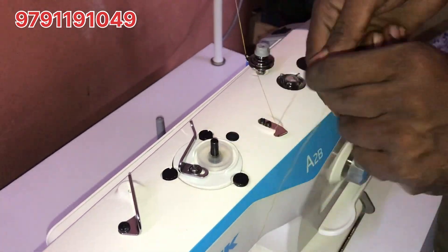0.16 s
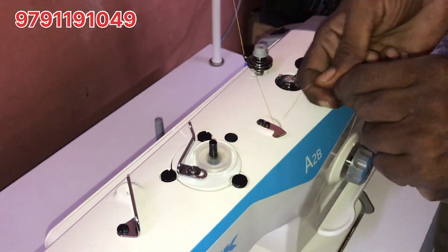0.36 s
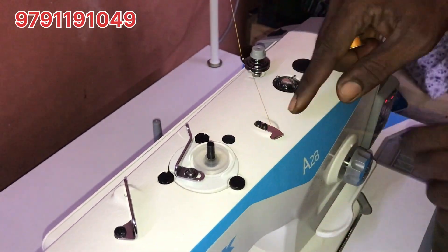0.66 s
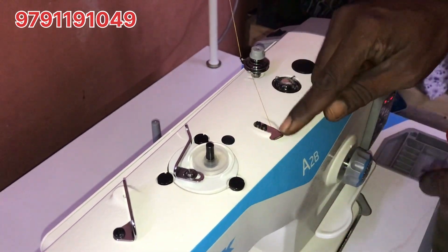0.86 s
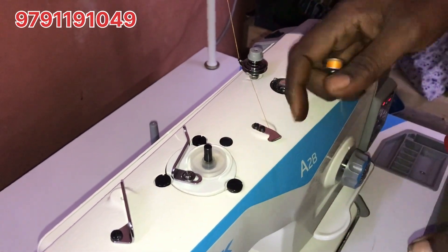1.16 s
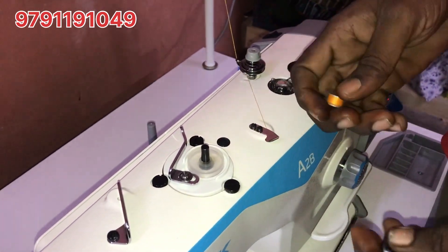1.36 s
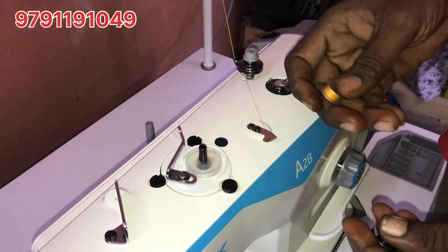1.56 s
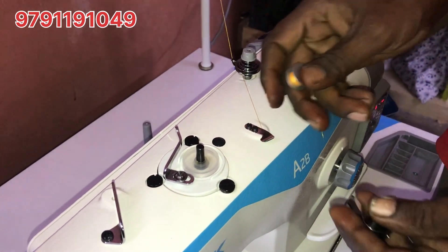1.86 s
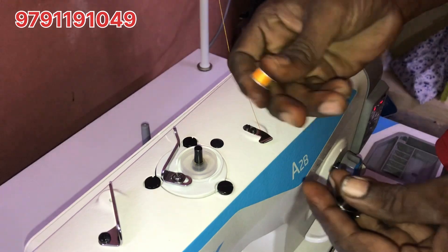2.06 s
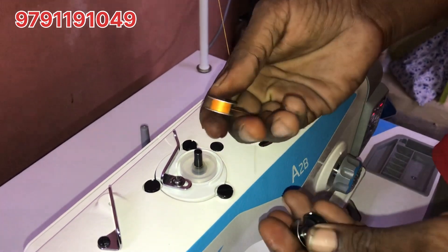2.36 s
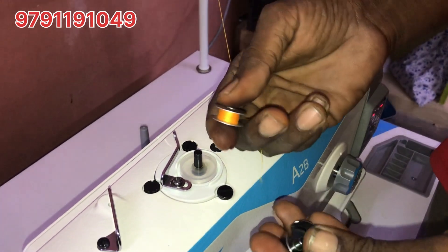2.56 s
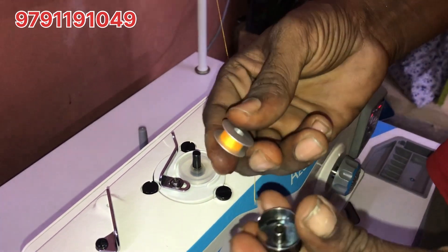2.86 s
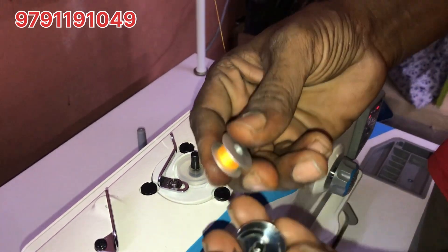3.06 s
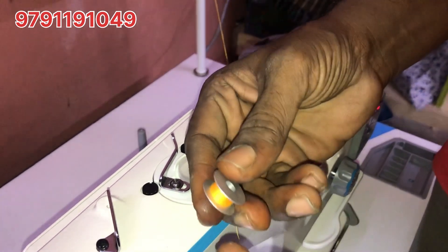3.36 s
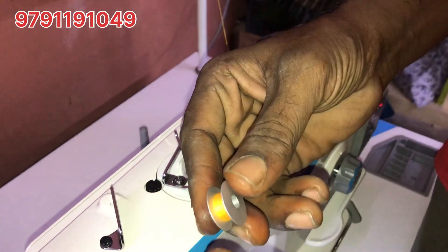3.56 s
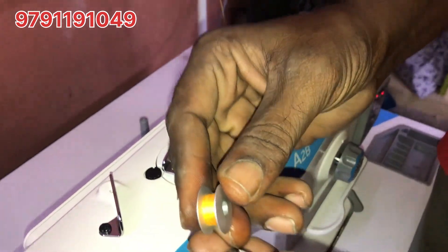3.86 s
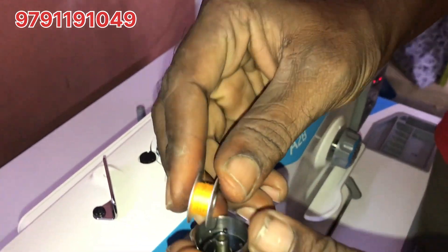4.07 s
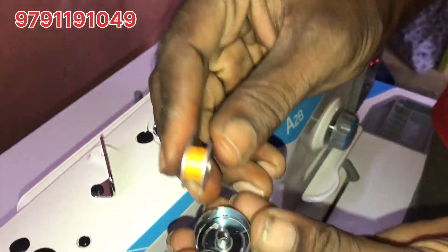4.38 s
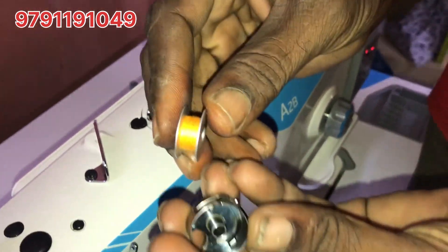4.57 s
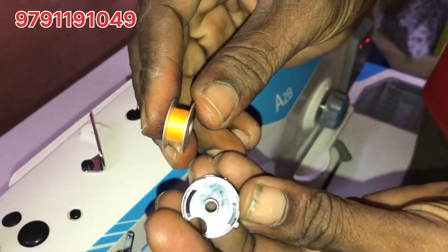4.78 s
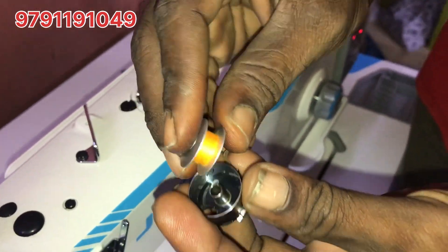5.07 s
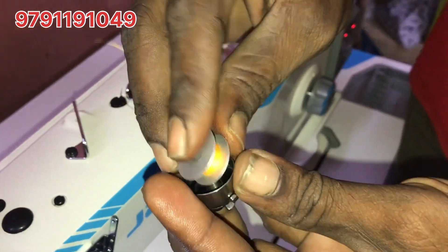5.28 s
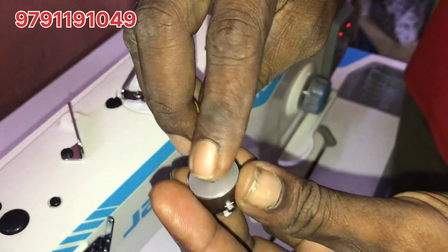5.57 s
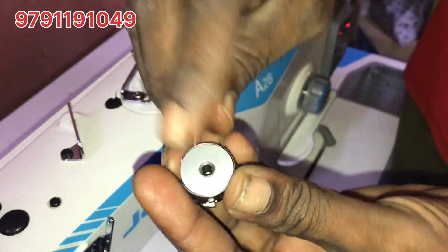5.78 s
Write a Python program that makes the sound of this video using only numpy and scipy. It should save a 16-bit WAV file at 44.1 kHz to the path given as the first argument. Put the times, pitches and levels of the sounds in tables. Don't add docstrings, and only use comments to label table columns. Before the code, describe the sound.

At 0 s a short knock rings the wooden table while a low machine hum and whirr sag away, with soft dull thumps until about 0.3 s. Around 0.31 to 0.38 s two or three tiny bright ticks of a pedal switch and clutch are heard, and the motor gives a brief nudge, swelling in hum and friction with a table thump. It eases off and coasts from about 0.5 to 0.75 s, then the drive grabs again with another thump, surging up by 1 s. From about 1.3 s to the end near 6 s it runs flat out at constant speed: deep throbbing hum near 60 Hz and its multiples, dense bright whirr with rapid fluttering pulses, thin gear whine and high hiss. Low wavering stand hums fade after about 3.5 s, and the low hum gets slightly fuller as the microphone nears. Small workshop, one close microphone, identical channels.

```python
import sys
import numpy as np
from scipy import signal
from scipy.fft import rfft, irfft
from scipy.io import wavfile
from scipy.ndimage import uniform_filter1d

SR = 44100
rng = np.random.default_rng(int(sys.argv[2]) if len(sys.argv) > 2 else 0)


def wav_out(sig):
    wavfile.write(sys.argv[1], SR, np.round(np.clip(np.atleast_2d(sig).T, -1, 1) * 32767).astype(np.int16))


def undo_db(level):
    steps = np.asarray(level, float) / 20
    return 10 ** steps


N = 261292

SHAFT_HZ, PATTERN_TURNS = 59.70, 7
# time in seconds, deviation from set speed in percent.
SPEED_CURVE = [(0, -12), (.33, -12), (.44, 0), (.6, 0), (.76, -4), (.84, 2), (1.0, 1.5), (1.25, .25),
               (1.6, .03), (5.93, -.03)]
# time in seconds, level over running in dB.
UNBALANCE_CURVE = [(0, -8), (.08, -34), (.37, -15.5), (.4, -12), (.466, 2.5), (.516, 2), (.58, -5.5),
                   (.65, -4), (.774, -22), (.8, -8.5), (.842, 0.5), (.98, 4.5), (1.11, 0), (1.23, -3),
                   (1.3, -0.5), (2.2, -1.5), (3.8, -0.5), (5.93, 0)]
# time in seconds, level over running in dB.
EFFORT_CURVE = [(0, -1.5), (.06, -9.5), (.11, -16.5), (.2, -21), (.305, -27.5), (.318, -8.5), (.345, -6.5),
                (.38, 0.5), (.45, 3), (.55, -1), (.66, -5.5), (.72, -8), (.76, -2), (.83, 1), (1.04, -1.5),
                (1.3, -0.5), (2, -.5), (5.93, 0)]
# time in seconds, share of the way.
NEARING_CURVE = [(0, 0), (2.6, 0.21), (3.8, 0.82), (5.93, 1)]
# switch closes, drive takes hold, pedal lifts, all in seconds.
PEDAL_PRESSES = [
    (.31, .38, 0.514),
    (0.766, .77, 7),
]
# frequency in Hz, level in dB, t60 in seconds.
KNOCK_MODES = [(677, -24, 0.29), (612, -22.5, 0.1), (504, -37, .2), (307, -32, 0.16), (1270, -31, 0.16),
               (950, -26, 0.13), (810, -30, .08), (205, -34, 0.26)]
# time in seconds, level in dB, frequency in Hz, time to ring down by
# about 33 dB in seconds.
TABLE_THUMPS = [(.005, -40, 172, 0.12), (0.031, -25.5, 87.5, 0.37), (.07, -27, 115.7, 0.34),
                (.17, -29, 188, 0.29), (0.181, -27, 130, 0.28), (.24, -29, 109.5, .3),
                (0.374, -18, 93.2, 0.32), (.575, -14.5, 91.5, 0.27), (.56, -29.5, 290, 0.47),
                (.7, -32, 60, 0.35), (.68, -23, 105, .3), (.785, -18, 101, 0.25)]
# frequency in Hz, width in Hz, level in dB.
TABLE_MODES = [(105, 32, -46.5), (138, 17, -46), (295.6, 18, -45), (551, 72, -42.5)]
# level in dB, share of unbalance sag, lead in seconds, near gain in dB.
LOW_ORDERS_DRIVE = [
    (-31, 1.7, 0.033, 5),
    (-31.5, 1.2, 0.055, -0.2),
]
# lag in seconds, share of effort swing, smoothing in seconds, near gain in dB.
WHIRR_DRIVE = [
    (0.026, 0.51, 0.024, -3),
    (.001, 1.04, .002, 0.64),
    (.001, 1.02, .004, 1.5),
]
# frequency in Hz, density in dB per Hz.
FRICTION_SPECTRUM = [(30, -19), (60, -12), (100, -18.5), (180, -3.5), (260, -12.5), (420, -8), (600, -3.5),
                     (850, -9.5), (1500, -6), (5100, -7.5), (5700, -12.5), (7500, -12.5), (10500, -14),
                     (15800, -10)]
# frequency in Hz, width in Hz, gain in dB.
CASING_MODES = [(1920, 62, 2), (2440, 220, -1), (3290, 210, 2.5), (3900, 180, 1.5), (4200, 130, 0),
                (4450, 250, 1.5), (5500, 290, 0.5), (5860, 300, 1), (6130, 320, 5.5), (7300, 220, 0.5),
                (9300, 2000, 2), (10300, 450, -2), (13700, 1200, 0.5), (15830, 210, 9), (6630, 250, -2),
                (7600, 250, -3), (13400, 400, 2), (14950, 500, 0), (14000, 150, 1)]
# frequency in Hz, level in dB.
REPEATING_SPECTRUM = [(200, -20), (700, -12), (1500, -10), (3000, -8), (5000, -6), (7000, -2), (10000, -2),
                      (12500, -4), (15000, -10)]
# place in turns, strength in dB, centre in Hz, decay in turns.
TURN_CONTACTS = [(.03, 2.5, 15000, .1), (.24, -1, 15000, .08), (.45, 4, 15000, .1), (.11, 2, 4500, .04),
                 (.57, 3, 4500, .07), (.85, 0, 4500, .07), (.24, 0, 1800, .1), (.36, 2, 1800, .05),
                 (.02, -4, 8000, .2), (.67, -3, 8000, .06)]
# frequency in Hz, share.
MEETING_SWING = [(500, .1), (2000, .12), (5000, .06), (9000, .03), (14000, .18)]
# multiple of shaft speed, level in dB.
LINKAGE_LINES = [(4, -40.5), (5, -36), (6, -46), (7, -46), (8, -51), (9, -50), (10, -46), (11, -38),
                 (12, -46), (15, -48), (17, -52), (18, -47), (19, -50), (20, -55), (21, -54), (22, -50),
                 (23, -47), (24, -48), (25, -51), (26, -54), (27, -48), (28, -52), (29, -51), (30, -53),
                 (31, -47), (32, -43), (33, -50), (34, -53), (35, -47)]
# multiple of shaft speed, level in dB.
GEAR_LINES = [(37, -51), (38, -47), (40, -46), (41, -41), (42, -50), (43, -51), (44, -46), (45, -49),
              (46, -52), (47, -48), (48, -51), (49, -53), (50, -50), (52, -51), (53, -47), (56, -43),
              (58, -50), (60, -50), (64, -48), (66, -52), (67, -52), (76, -52), (80, -46), (82, -51),
              (84, -52), (85, -50), (86, -46), (87, -53), (88, -46), (104, -53)]
# multiple of hook speed, level in dB.
HOOK_LINES = [(4, -39), (6, -49), (19, -53), (20, -45), (22, -51), (26, -49), (32, -51), (37, -50),
              (41, -53), (44, -53), (50, -45), (52, -53), (53, -51), (57, -50)]
# multiple of the seven-turn pattern rate, level in dB.
MESH_LINES = [(32, -54), (34, -50), (60, -53), (64, -52), (65, -51), (76, -53), (158, -52), (199, -53),
              (219, -55), (234, -52), (276, -49), (281, -53), (284, -47), (288, -54), (325, -54),
              (326, -54), (335, -54), (340, -48), (346, -55), (368, -51), (375, -53), (401, -54),
              (535, -55), (571, -54), (584, -53), (585, -54), (591, -54), (604, -54), (613, -54),
              (648, -55)]
# start in seconds, end in seconds, centre in Hz, width
# in Hz, gain in dB.
BAND_SHADES = [(6, 1.6, 13400, 600, 4.5), (0, 3.1, 12900, 360, 3.5), (3, 7, 14300, 900, 3.5),
               (1, 4.8, 10500, 500, 3), (3.5, 7, 7500, 260, 5), (2.1, 3.4, 5270, 470, 1.5),
               (5, 7, 4500, 120, 1), (1.5, 1.4, 1060, 46, 5.5), (1.8, 4, 2440, 120, 3),
               (1.8, 3.1, 6900, 400, 3), (2, 2.9, 9130, 500, 0), (0.2, 1.4, 9100, 1100, 3.5),
               (5, 7, 2600, 350, -3), (5, 7, 3300, 120, -2.5), (4, 7, 15200, 400, -1),
               (1, 2.2, 11800, 400, 3), (4, 7, 870, 390, 2), (.2, 1.5, 5130, 330, -4),
               (-1, 0.23, 7000, 1700, 3.5), (-1, .3, 14500, 2500, -5.5), (3.5, 4.9, 1360, 170, 3),
               (2.5, 3.7, 1890, 120, 3), (-0.5, 2.7, 2640, 63, 2.5), (3.5, 7, 2450, 63, -3)]
# frequency in Hz, width in Hz, gain in dB.
SURGE_MODES = [(2780, 260, 8.2), (1820, 330, 4.7)]
# time in seconds, peak level in dB.
TICK_TIMES = [
    (.3131, -21),
    (.355, -28),
    (.38, -28),
]
# frequency in Hz, width in Hz, level in dB.
HOUSING_MODES = [(4200, 1200, -15), (8800, 800, -12.5), (14000, 900, -6)]
# frequency in Hz, level in dB, time shaken tight in seconds.
STAND_PARTS = [(72.4, -41.5, 3.5), (127.7, -39, 3.6)]

SURGE_S = 0.13
SAG_DB, PULL_LOW_DB, PULL_LAG_S = 1.5, 7.5, .05
THIRD_DB, THIRD_NEAR_DB = -21.5, 1.5
QUARTER_TURN = .25
COAST_DB, COAST_S, PULL_HISS_DB, HISS_FLOOR_DB = -6, .05, -2, -23
STAND_START_S, STAND_RISE_DB_PER_S, STAND_FADE_DB_PER_S = 1.32, 44, 9
ROOM_DB, ROOM_HZ = -42.5, 130


def in_time(curve):
    s, value = np.transpose(curve)
    return np.interp(np.arange(N) / SR, s, value)


def at_hz(points, hz):
    point_hz, value = np.transpose(points)
    return np.interp(np.log(hz), np.log(point_hz), value)


def rms_one(x):
    return x / np.sqrt(np.mean(x ** 2) + 1e-20)


def drift(rate_hz):
    r = np.exp(-200 * np.pi * rate_hz / SR)
    white = rng.standard_normal(N // 100 + 2002)
    slow = signal.lfilter([1], [1, -2 * r, r * r], white)[2000:]
    return np.interp(np.arange(N) / 100, np.arange(len(slow)), rms_one(slow - slow.mean()))


def ring(x, hz, width_hz):
    r, w = np.exp(-np.pi * width_hz / SR), 2 * np.pi * hz / SR
    return signal.lfilter([0, np.sin(w)], [1, -2 * r * np.cos(w), r * r], x + 1e-18)


def click(s, db):
    return undo_db(db) * (np.arange(N) == round(s * SR))


def filtered(x, order, hz, kind):
    return signal.sosfilt(signal.butter(order, hz, kind, fs=SR, output="sos"), x)


def shifted(x, lag_s):
    return np.interp(np.arange(N) - lag_s * SR, np.arange(N), x)


def pull_up(t):
    return sum(np.exp(-np.maximum(t - hold, 0) / SURGE_S) * (t > hold) for _, hold, _ in PEDAL_PRESSES)


def hum_levels():
    swing_db, near = in_time(UNBALANCE_CURVE), in_time(NEARING_CURVE)
    sag_db = np.minimum(swing_db + SAG_DB, 0)
    pull_db = PULL_LOW_DB * pull_up(np.arange(N) / SR - PULL_LAG_S)
    low = [db + np.maximum(share * shifted(sag_db, -lead_s), -30) + near_db * near + pull_db
           for db, share, lead_s, near_db in LOW_ORDERS_DRIVE]
    return low + [THIRD_DB + swing_db + THIRD_NEAR_DB * near]


def whirr_levels():
    t, effort_db, near = np.arange(N) / SR, in_time(EFFORT_CURVE), in_time(NEARING_CURVE)
    body, gears, hiss = (
        share * uniform_filter1d(shifted(effort_db, lag_s), 1 + int(abs(smooth_s) * SR)) + near_db * near
        for lag_s, share, smooth_s, near_db in WHIRR_DRIVE)
    powered = sum((t > on) * np.clip(1 - (t - off) / COAST_S, 0, 1) for on, _, off in PEDAL_PRESSES)
    hiss = hiss + COAST_DB * (1 - powered) + PULL_HISS_DB * pull_up(t)
    hiss = 10 * np.log10(undo_db(2 * hiss) + undo_db(2 * HISS_FLOOR_DB))
    return np.array([body, gears, hiss])


def room():
    return undo_db(ROOM_DB) * rms_one(filtered(rng.standard_normal(N), 3, [65, ROOM_HZ], "band"))


def knock():
    return sum(ring(click(0.0012, db), hz, 2.0 / decay_s) for hz, db, decay_s in KNOCK_MODES)


def thumps():
    out = 0
    for s, db, hz, decay_s in TABLE_THUMPS:
        push = np.hanning(round(.6 * SR / hz)) * 3.0 * hz / SR
        out = out + ring(np.convolve(click(s, db), push)[:N], hz, 1.2 / decay_s)
    return out


def table_shake():
    shake = undo_db(whirr_levels()[0] - 0.5)
    out = 0
    for hz, width_hz, db in TABLE_MODES:
        once = ring(rng.standard_normal(N), hz, width_hz)
        out = out + undo_db(db) * shake * rms_one(ring(once, hz, width_hz))
    return out


def shaft_hum(turns):
    phases = rng.random() * np.arange(1, 4) + [0, QUARTER_TURN, 0]
    return sum(np.sqrt(2) * undo_db(db + 0.29 * drift(2.6)) * np.sin(2 * np.pi * (k * turns + phase))
               for k, phase, db in zip((1, 2, 3), phases, hum_levels()))


def looped(turns, size):
    surface = np.resize(rng.standard_normal(size), size + 1)
    return rms_one(np.interp(turns % 1 * size, np.arange(size + 1), surface))


def contact_pulse(hz, place):
    return rms_one(1 + sum(undo_db(db) * np.exp(-((place - at) % 1) / decay - 8 * np.log(hz / centre) ** 2)
                           for at, db, centre, decay in TURN_CONTACTS))


def whirr(turns):
    levels = whirr_levels()
    levels -= levels[:, N // 2:].mean(axis=1, keepdims=True)
    white = rng.standard_normal((2, N))
    repeating = looped(turns, size=1400) + .5 * looped(turns / PATTERN_TURNS, size=9800)
    meeting = np.sin(8 * np.pi * turns / PATTERN_TURNS)
    together = drift(40)
    place = np.arange(600) / 600
    index = (turns % 1 * len(place)).astype(int)
    edges, out = 40 * 2 ** np.arange(0, 9.1, 1 / 3), 0
    for k, (low, high) in enumerate(zip(edges, edges[1:])):
        hz = np.sqrt(low * high)
        source = white[k % 2] + undo_db(at_hz(REPEATING_SPECTRUM, hz)) * repeating
        band = filtered(source, 2, [low, high], "band")
        part = np.interp(np.log(hz), np.log([700, 3000, 11000]), [0, 1, 2])
        first = min(int(part), 1)
        level_db = levels[first] + (part - first) * (levels[first + 1] - levels[first])
        flicker_db = 0.43 * together + 0.38 * drift(10)
        swing = 1 + at_hz(MEETING_SWING, hz) * meeting
        out = out + band * swing * contact_pulse(hz, place)[index] * undo_db(level_db + flicker_db)
    hz = np.fft.rfftfreq(N, 1 / SR) + 1
    casing_db = sum(db / (1 + (2 * (hz - f) / width_hz) ** 2) for f, width_hz, db in CASING_MODES)
    colour = undo_db(at_hz(FRICTION_SPECTRUM, hz) + casing_db)
    return undo_db(-26.5) * rms_one(irfft(rfft(out) * colour, N))


def orders(turns, lines, wobble_db, slip):
    gains = [undo_db(wobble_db * drift(0.62)) for _ in range(6)]
    slips = [slip * drift(4.0) for _ in range(5)]
    out = 0
    for i, (k, db) in enumerate(lines):
        phase = 2 * np.pi * (k * turns + rng.random()) + np.sqrt(k) * slips[i % 5]
        out = out + np.sqrt(2) * undo_db(db) * gains[i % 6] * np.sin(phase)
    return out


def gear_whine(turns):
    linkage = orders(turns, LINKAGE_LINES, wobble_db=.8, slip=.02)
    gears = undo_db(.8) * orders(turns, GEAR_LINES, wobble_db=1.2, slip=.03)
    hook = orders(turns * 11 / PATTERN_TURNS, HOOK_LINES, wobble_db=1.0, slip=.03)
    mesh = undo_db(0.2) * orders(turns / PATTERN_TURNS, MESH_LINES, wobble_db=1.5, slip=0.019)
    settled = np.interp(np.arange(N) / SR, [.7, .95], [.4, 1])
    return undo_db(whirr_levels()[1] - 0.1) * settled * (linkage + gears + hook + mesh)


def shaded(x, patchy_db):
    hz, t, frames = signal.stft(x, SR, nperseg=1024)
    field = rng.standard_normal(frames.shape)
    for size, axis in ((7, 0), (7, 0), (60, 1), (60, 1)):
        field = uniform_filter1d(field, size, axis=axis)
    gain_db = patchy_db * rms_one(field) * np.clip(hz / 2000, 0, 1)[:, None]

    def bump(centre, width_hz):
        return np.exp(-.5 * (2 * (hz - centre) / width_hz) ** 2)

    for start, end, centre, width_hz, db in BAND_SHADES:
        held = 1 / (1 + np.exp((start - t) / 0.074)) / (1 + np.exp((t - end) / 0.11))
        gain_db += db * np.outer(bump(centre, width_hz), held)
    for centre, width_hz, db in SURGE_MODES:
        gain_db += db * np.outer(bump(centre, width_hz), pull_up(t))
    return signal.istft(frames * undo_db(gain_db), SR, nperseg=1024)[1][:N]


def ticks():
    decay = np.exp(-1 / (.0014 * SR))
    fall = sum(signal.lfilter([1], [1, -decay], click(s, db) + 1e-18) for s, db in TICK_TIMES)
    crack = fall * rng.standard_normal(N)
    rung = sum(undo_db(db) * ring(crack, hz, width_hz) for hz, width_hz, db in HOUSING_MODES)
    return filtered(0.26 * crack + rung, 2, 2500, "high")


def stand():
    t = np.arange(N) / SR
    rise_db = STAND_RISE_DB_PER_S * np.minimum(t - STAND_START_S, 0)
    out = 0
    for hz, db, tight_s in STAND_PARTS:
        fade_db = STAND_FADE_DB_PER_S * np.maximum(t - tight_s, 0)
        level = np.sqrt(2) * undo_db(db + rise_db - fade_db + 1.8 * drift(1.3))
        out = out + level * np.sin(2 * np.pi * hz * t + 0.51 * drift(0.65))
    return out


def scene():
    speed = 1 + in_time(SPEED_CURVE) / 100 + .0002 * drift(3)
    turns = np.cumsum(SHAFT_HZ * speed) / SR
    wood = knock() + thumps() + table_shake()
    mechanism = shaded(whirr(turns) + gear_whine(turns), patchy_db=.7)
    return np.tile(room() + wood + shaft_hum(turns) + mechanism + ticks() + stand(), (2, 1))


def low_pass(x):
    return signal.sosfilt(signal.butter(12, 16350, fs=SR, output="sos"), x)


def record(dry):
    x = filtered(dry, 2, 40, "high")
    x = signal.sosfilt(signal.ellip(12, .5, 55, 15750, fs=SR, output="sos"), x)
    return low_pass(x)


dry = scene()
out = record(dry)
wav_out(out)
```